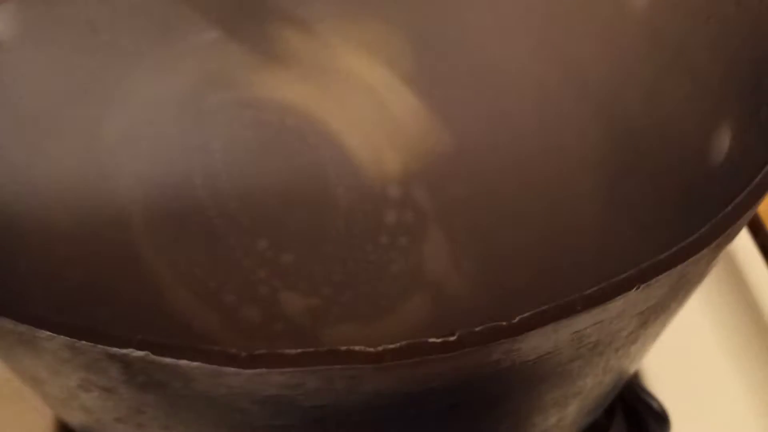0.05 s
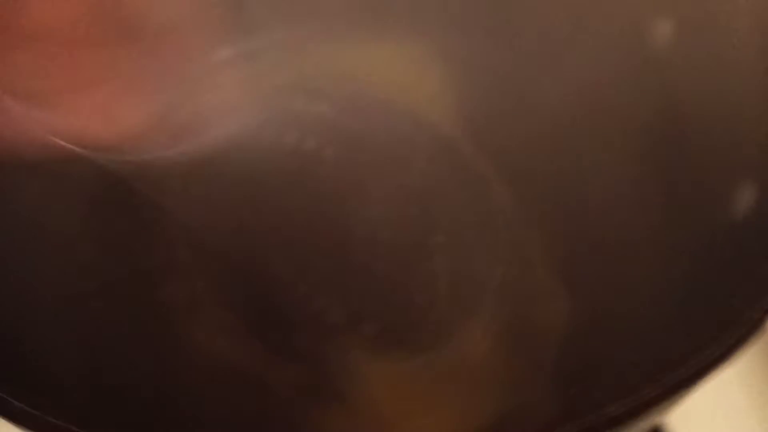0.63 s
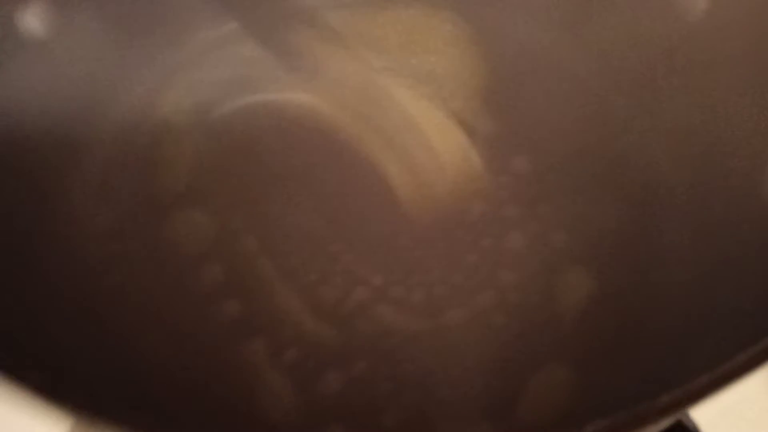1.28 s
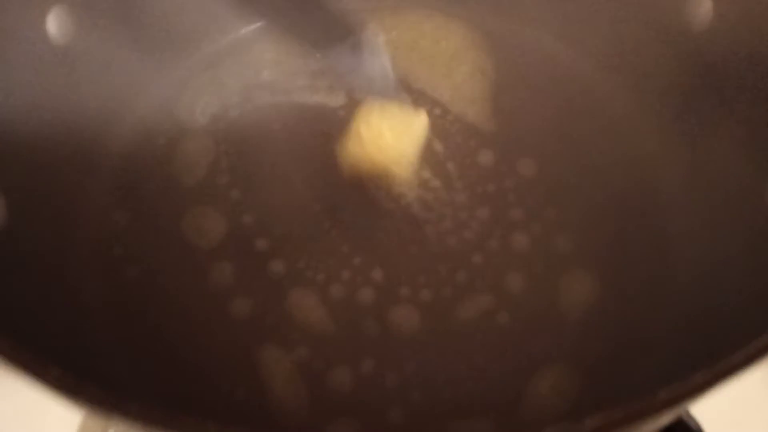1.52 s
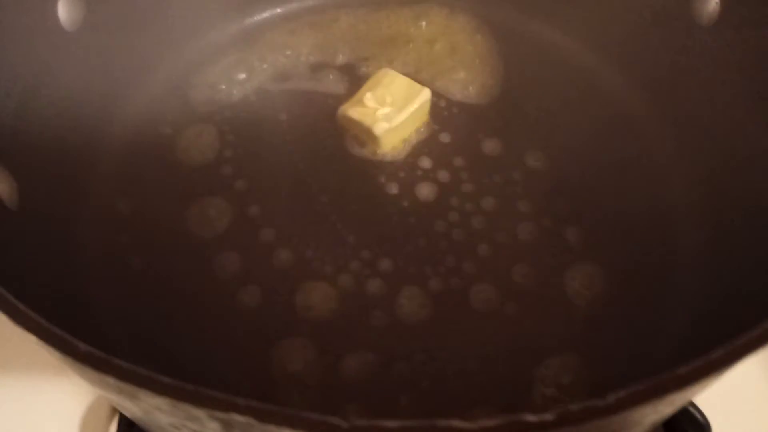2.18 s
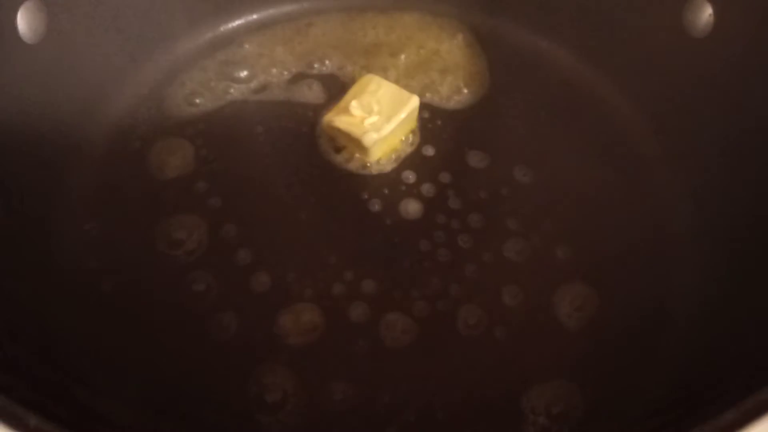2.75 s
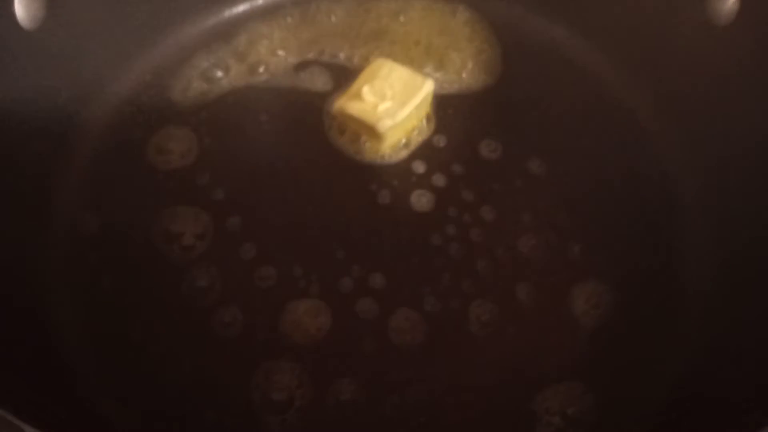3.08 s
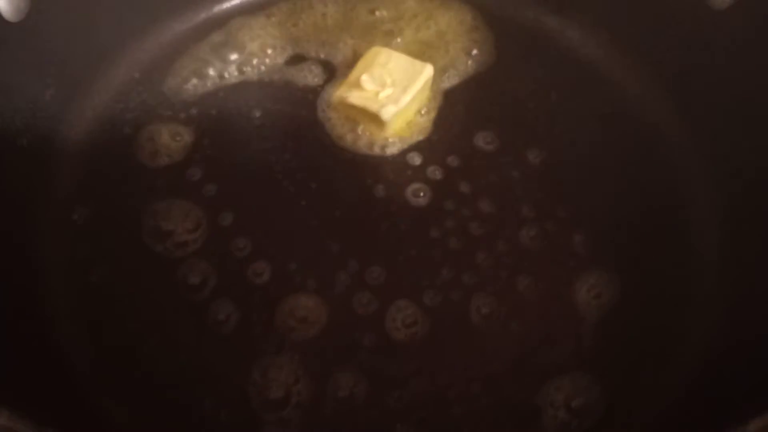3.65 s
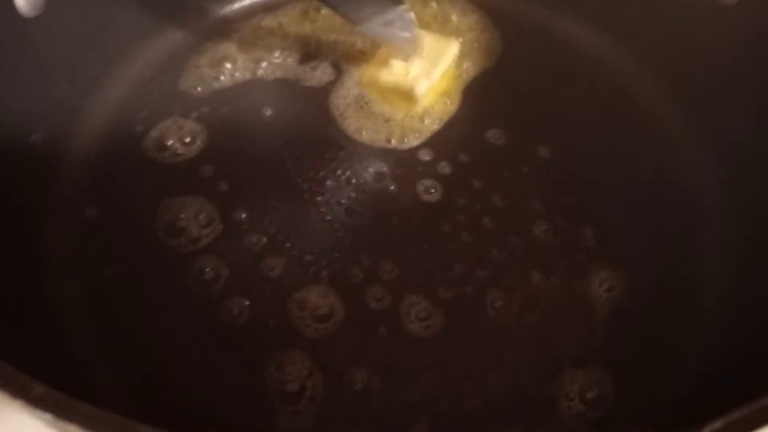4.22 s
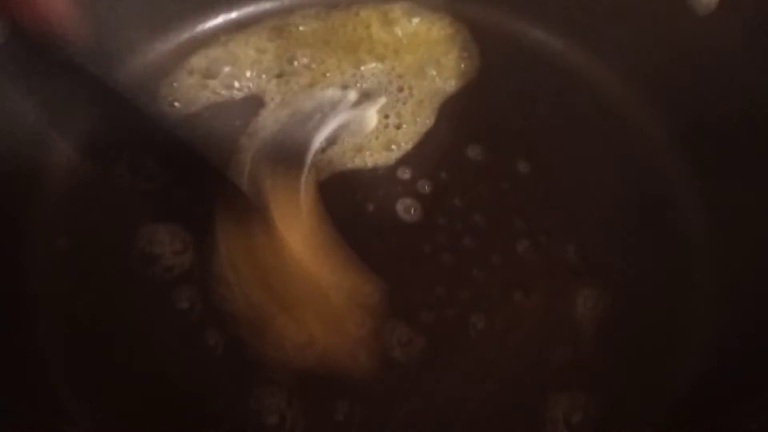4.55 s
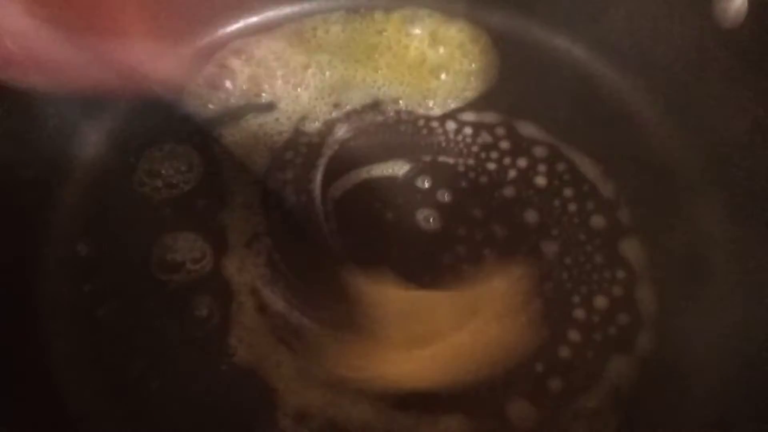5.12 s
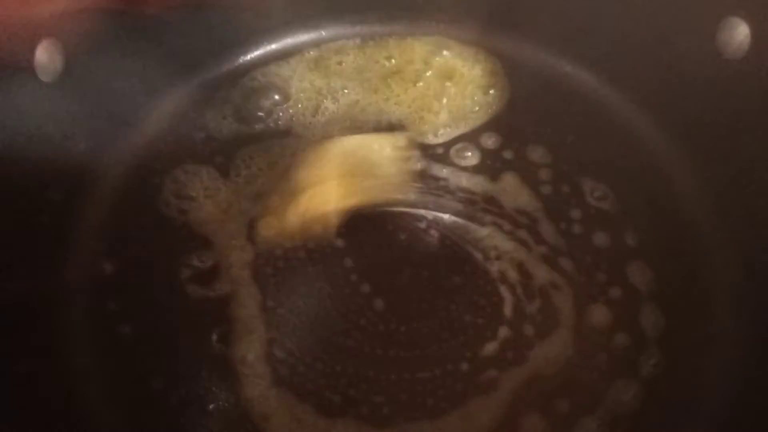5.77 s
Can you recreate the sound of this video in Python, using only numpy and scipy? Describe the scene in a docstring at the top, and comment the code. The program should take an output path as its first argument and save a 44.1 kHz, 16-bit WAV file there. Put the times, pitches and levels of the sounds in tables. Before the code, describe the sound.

A fine, crackling sizzle of melting butter, with a utensil clunking round the pan, pausing, then stirring again and scraping hard.

```python
"""Butter sizzles in a hot frying pan, heard in mono from close by the kitchen stove.
The lump is pushed round, left to melt, then pushed round again. Countless tiny steam bubbles
burst in the fat and a few larger ones spit. The utensil knocks and rubs the pan, which rings and
thuds on the stove; near the end one hard scrape makes the metal squawk. Behind it all lies a low,
wavering rush: room noise coloured by the resonance of the camera body."""
import sys
import numpy as np
from scipy import signal
from scipy.fft import rfft, irfft, next_fast_len
from scipy.io import wavfile

SR = 44100
rng = np.random.default_rng(int(sys.argv[2]) if len(sys.argv) > 2 else 0)


def transcribe(signal):
    """Save signal, clipped to [-1, 1], as a 16-bit WAV file at the path in sys.argv[1]."""
    frames = np.atleast_2d(signal).T
    limited = np.clip(frames, -1, 1)
    pcm = np.round(limited * 32767).astype(np.int16)
    wavfile.write(sys.argv[1], SR, pcm)


N = 260190
TIME = np.arange(N) / SR

# modes of the rubbed pan: f/Hz, nominal width/Hz, level under a light touch/dB, level pressed hard/dB
RUBBED_MODES = [(474, 26, -21, -16), (545, 30.5, 4, 3), (605, 33, -3, -1), (641, 15, -15, 1),
                (683, 57, -19, -19), (1089, 16.4, 6.5, 0.5), (1137, 85, -0.5, -6.5), (1724, 40, 0.5, -5),
                (1930, 200, -19.5, -15), (2540, 180, -7.5, -21)]


def sizzle(gain_db=3.5, clump_db=6.5, hiss_db=-6, patter_db=-16):
    """Bubbles burst in clumps over a fine hiss; butter spread thin boils brighter and more evenly."""
    # boiling of the fat: t/s, relative level/dB, treble lift as the butter thins/dB
    boil = [(0, -34, 4), (.45, -33, 3.5), (1, -34, 4), (1.2, -33.5, 4), (1.5, -31.5, 3), (2.1, -32, 2.5),
            (2.5, -32.6, 1.9), (3.2, -32.5, 1.97), (3.85, -31, 1.5), (4.4, -32, 1.8), (4.55, -34, 4.6),
            (4.76, -36, 7.5), (5.35, -34.8, 6), (5.65, -33.3, 4), (5.9, -33.5, 4)]
    # spectrum of the bursting bubbles: f/Hz, level/dB
    fizz = [(800, -34.5), (1500, -22), (2500, -17), (3200, -15), (3900, -9.5), (5200, -1.5), (6500, 8),
            (7150, 5.5), (8000, -7), (9200, -5), (10800, 3.5), (12300, -4), (13900, -9.5), (14700, 3.5),
            (15700, 2.5)]
    # modes of the pan under the fat: f/Hz, nominal width/Hz, level/dB
    patter_modes = [(585, 58, 0), (1117, 110, -2), (1673, 42, -2.5), (2271, 32, 4.5), (2856, 64, 5),
                    (3685, 230, 7), (3950, 103, 13), (4580, 390, 10)]
    times, levels, lifts = np.transpose(boil)
    boil_db, thin_db = np.interp(TIME, times, levels), np.interp(TIME, times, lifts)
    unrest = np.clip(0.5 - 0.074 * thin_db, .2, 2)
    clumps = amp(clump_db * unrest * drift(rate_hz=26))
    bursts = clumps * bubbles(per_s=3000, spread_db=5.5)
    hiss = amp(hiss_db) / unrest * rng.standard_normal(N)
    in_air = unit_rms(colour(bursts + hiss, fizz))
    highpass = signal.firwin2(63, [0, 7000, 13500, SR / 2], [0, 0, 1, 1], fs=SR)
    treble_lift = signal.oaconvolve(in_air, highpass, "same") * (amp(thin_db) - 1)
    # the bigger bubbles of a thick pool also shake the metal
    in_metal = amp(patter_db - thin_db) * resonances(clumps * rng.standard_normal(N), patter_modes)
    return amp(boil_db + swells_db() + gain_db) * (in_air + treble_lift + in_metal)


def bubbles(per_s, spread_db, spurt_db=3, classes=16):
    """Steam bubbles burst with brief snaps; each size class has its own pitch and its own spurts."""
    t, out = np.arange(100) / SR, np.zeros(N)
    for hz in np.linspace(2500, 17000, classes):
        at = np.flatnonzero(rng.random(N) < per_s / classes / SR)
        strength_db = spread_db * (hz / 9000) ** 0.5 * np.minimum(rng.exponential(1, len(at)), 3)
        clicks = np.zeros(N)
        clicks[at] = amp(strength_db + spurt_db * drift(rate_hz=25)[at]) * rng.choice([-1, 1], len(at))
        snap = np.exp(-t / 0.00031) * np.cos(2 * np.pi * hz * t)
        out += unit_rms(pan_walls(np.convolve(clicks, snap)[:N]))
    return unit_rms(out)


def pan_walls(snaps, echo_db=-3, t60=0.086):
    """Each snap bounces about between the walls of the pan."""
    t = np.arange(1024) / SR
    echoes = rng.standard_normal(len(t)) * amp(-60 * t / t60) * (t > .0005)
    return snaps + amp(echo_db) * signal.oaconvolve(snaps, echoes / np.linalg.norm(echoes))[:N]


def swells_db():
    """The sizzle flares up or dips briefly, each time in one smooth arch."""
    # flares and dips: middle t/s, length/s, level change/dB
    arches = [(0.163, 0.16, 2), (0.244, .11, -3), (1.167, .08, -1.5), (2.357, 0.073, -1.5),
              (3.358, 0.14, 1.5), (3.477, .06, -3), (4.062, 0.11, -5), (4.27, 0.08, 1), (4.304, 0.034, -4),
              (4.663, 0.21, 1.5), (5.496, 0.059, 2.5)]
    return sum(db * np.cos(np.pi * np.clip((TIME - s) / length, -.5, .5)) ** 2
               for s, length, db in arches)


def spits(decay_s=0.0014):
    """A large bubble bursts with a short puff around its own pitch."""
    # single bursts of fat: t/s, level/dB, f/Hz
    bursts = [(2.875, -22, 11100), (3.493, -24, 10500), (3.507, -22, 7600), (3.909, -23, 6560),
              (4.172, -21, 10200), (4.244, -21.5, 6660), (4.354, -22, 10100), (4.39, -25.5, 5030),
              (4.429, -27.5, 7000)]
    t, out = np.arange(800) / SR, np.zeros(N)
    for s, db, hz in bursts:
        puff = resonances(rng.standard_normal(len(t)), [(hz, hz / 4, 0)])
        add(out, s, amp(db) * puff * np.exp(-t / decay_s))
    return out


def knocks(free_db=10, gripped_db=2.5, free_t60=1.6, gripped_t60=0.13, thud_t60=0.34, tail_t60=0.95):
    """Each blow rings the pan and jolts it against the stove; a firm grip chokes the ring."""
    # blows: t/s, relative level/dB, contact/ms, grip (0 the utensil bounces off, 1 it stays pressed on)
    blows = [(.102, -35.5, 0.17, 0.93), (.116, -38, .28, 0.89), (.175, -51, .25, 0.56),
             (.3037, -35, .13, 0.15), (.5195, -37, 0.44, 1), (.562, -43.5, 0.62, 0.69),
             (.7785, -35.5, .14, .15), (0.9726, -31.5, .16, 0.97), (.986, -36, 0.1, 0.82),
             (1.1284, -36, 0.13, 0.054), (1.160, -44, .42, 0.11), (1.409, -50, 0.97, 1),
             (4.1263, -34, 0.21, 0.25), (4.5026, -38.5, 0.51, .65), (4.578, -54, 0.8, 0.82),
             (4.8322, -37, 0.27, 0.44), (4.88, -46, 0.45, 0.6), (5.0171, -37, 0.38, 0.77),
             (5.114, -50, 0.45, 0.58), (5.2594, -37, 0.17, .55), (5.4175, -39.5, 0.45, 0.6)]
    # modes of the struck pan: f/Hz, level/dB, t60 before the utensil's damping/s
    struck_modes = [(379, -25, 0.84), (518, -1, 0.03), (547.6, 0, 0.29), (539, -16.5, 1), (646.5, -8, 0.26),
                    (824, -7, 0.03), (1092, -4, 0.095), (975, -5, 0.013), (1050, -2, 0.017),
                    (1226, -5, 0.056), (1755, -7.5, 0.024), (2108, -5, 0.05), (2294, -13, 0.15),
                    (2660, -3, 0.025), (3344, -12, 0.09), (3800, -6.5, 0.041), (5300, 2.5, 0.03)]
    # spectrum of the pan hitting the stove: f/Hz, level/dB
    thud_spectrum = [(30, -24), (70, -10), (130, -5), (250, -2), (450, 1), (650, -6), (850, -6.5),
                     (1150, -10.5), (1500, -11), (2800, -16), (5000, -15.5), (9000, -92)]
    # spectrum of stove and room after a blow: f/Hz, level/dB
    tail_spectrum = [(30, -27), (110, 9.5), (220, 2.5), (420, -17), (750, -35), (1200, -14), (3000, -48),
                     (6000, -54)]
    t, out = np.arange(SR) / SR, np.zeros(N)
    hz, mode_db, t60 = np.transpose(struck_modes)[:, :, None]
    signs = (-1) ** np.arange(len(hz))[:, None]  # neighbouring modes start in opposite directions
    thud_attack = 1 - np.exp(-t / 0.0008)
    for s, db, contact_ms, grip in blows:
        # each spot on the pan rings a little differently
        spot_db, detune = rng.uniform(-1.06, 1, (2, len(hz), 1))
        push = 1 / (1 + (hz * contact_ms / 1000) ** 2)  # a longer contact is duller
        tones = signs * np.sin(2 * np.pi * hz * (1 + 0.0097 * detune) * t)
        ring = (push * amp(mode_db + spot_db - 60 * t / t60) * tones).sum(0)
        ring_db = free_db + grip * (gripped_db - free_db)
        damping_t60 = free_t60 * (gripped_t60 / free_t60) ** grip
        add(out, s, amp(db + ring_db - 60 * t / damping_t60) * ring)
        thud = unit_rms(colour(gritty_noise(SR, grit=0.45), thud_spectrum)) * amp(-60 * t / thud_t60)
        tail = unit_rms(colour(rng.standard_normal(SR), tail_spectrum)) * amp(-18 - 60 * t / tail_t60)
        add(out, s, amp(db - 1) * (thud + tail) * thud_attack)
    return out


def scrape(level_db=-32.5, waver=0.013, upper_db=-13):
    """The utensil catches, chatters, and locks now and then onto two pan modes."""
    # moments of squeal: t/s, length/s, level/dB
    squeals = [(5.504, 0.014, -28), (5.521, .02, -24.5), (5.555, 0.035, -30), (5.647, 0.0073, -28),
               (5.703, 0.022, -43.5)]
    # the two squealing modes: f/Hz
    squeal_hz = [1078, 1724]
    pressure = amp(level_db) * envelope(start_s=5.501, length_s=0.18, rise_s=0.0039, t60=0.28)
    modes = [(hz, width, hard) for hz, width, light, hard in RUBBED_MODES]
    chatter = friction(modes, slips_per_s=2700, uneven_db=1.5)
    pitches = [hz * (1 + waver * drift(rate_hz=90)) for hz in squeal_hz]
    lower, upper = (unit_rms(np.sin(2 * np.pi * np.cumsum(hz) / SR)) for hz in pitches)
    squeal = gestures(squeals, rise_s=0.0053, t60=.07) * (lower + amp(upper_db) * upper)
    return pressure * chatter + squeal


def stirring():
    """The utensil slides quietly on the greased metal and rasps where its edge digs in."""
    # sliding strokes: t/s, length/s, level/dB
    strokes = [(-.05, 0.17, -47), (.37, 0.15, -47.5), (.58, 0.09, -57.5), (.83, 0.34, -51),
               (1.18, .14, -55.5), (4.42, 0.3, -51), (4.88, 0.54, -56), (5.4, 0.47, -61)]
    # digs of the edge: t/s, length/s, relative level/dB
    digs = [(.09, 0.062, -41.5), (.39, 0.027, -52), (5.565, 0.046, -43.5)]
    # spectrum of the rasp: f/Hz, level/dB
    rasp_spectrum = [(900, -24), (1600, -36), (1880, -4), (2300, -4.5), (2850, 2), (3400, -3), (6000, -49)]
    modes = [(hz, width, light) for hz, width, light, hard in RUBBED_MODES]
    rub = friction(modes, slips_per_s=2500, uneven_db=4.5)
    rasp = amp(-1) * unit_rms(colour(gritty_noise(N, grit=0.36), rasp_spectrum))
    return gestures(strokes, rise_s=0.053, t60=0.51) * rub + gestures(digs, rise_s=0.015, t60=0.27) * rasp


def friction(modes, slips_per_s, uneven_db):
    """Tiny slips of the utensil drive the resonances of the pan."""
    slips = rng.standard_normal(N) * (rng.random(N) < slips_per_s / SR)
    return resonances(slips * amp(uneven_db * drift(rate_hz=11)), modes)


def scuffs(reference_hz=215):
    """Soft brushing close to the microphone; a lighter scuff has the same colour, pitched higher."""
    # scuffs: t/s, length/s, level/dB, f/Hz
    brushes = [(3.276, 0.079, -41.5, 215), (3.574, .04, -52, 585), (4.371, 0.047, -51, 570)]
    # spectrum of a scuff at the reference pitch: f/Hz, level/dB
    spectrum = [(35, -38), (60, -21), (113, -26), (215, -2.5), (503, -15.5), (577, -13), (1080, -29),
                (1180, -26), (1350, -32), (1550, -18), (3500, -18.5), (4550, -28), (7700, -120)]
    out = np.zeros(N)
    for s, length, db, hz in brushes:
        shifted = [(f * hz / reference_hz, level) for f, level in spectrum]
        brush = unit_rms(colour(rng.standard_normal(N), shifted))
        out += amp(db) * envelope(s, length, rise_s=0.02, t60=0.34) * brush
    return out


def metal_rings():
    """Lightly touched metal sings faintly for a second, barely damped."""
    # ringing tones: t/s, f/Hz, level/dB, t60/s
    tones = [(1.405, 880, -56.5, 1.2), (2.893, 735, -63.5, 7.3)]
    t, out = np.arange(SR) / SR, np.zeros(N)
    for s, hz, db, t60 in tones:
        add(out, s, amp(db - 60 * t / t60) * np.sin(2 * np.pi * hz * t))
    return out


def background_rush(level_db=-60, waver_db=2.46):
    """A low, wavering rush: room noise coloured by the resonance of the camera body."""
    # room noise with the camera body's bump at 200-350 Hz: f/Hz, level/dB
    spectrum = [(25, -17), (70, -18), (115, -8.5), (160, -14.5), (215, 0.5), (320, -0.5), (480, -8),
                (640, -46), (820, -25), (1500, -28), (5000, -39)]
    gain = amp(level_db + waver_db * drift(rate_hz=29))
    return gain * unit_rms(colour(rng.standard_normal(N), spectrum))


def amp(db):
    """Decibels to gain."""
    return 10 ** (np.asarray(db) / 20)


def unit_rms(x):
    """Scales to rms 1."""
    return x / np.sqrt(np.mean(x ** 2) + 1e-20)


def add(mix, s, sound):
    """Mixes a sound in at s seconds."""
    part = mix[max(round(s * SR), 0):][:len(sound)]
    part += sound[:len(part)]


def gritty_noise(size, grit):
    """Noise that grows spikier with grit."""
    return rng.standard_normal(size) * np.exp(grit * rng.standard_normal(size))


def colour(x, spectrum, size=4096):
    """Causal filter with a spectrum of (f/Hz, level/dB), so clicks keep their sharp start."""
    hz, db = np.transpose(spectrum)
    bin_hz = abs(np.fft.fftfreq(size, 1 / SR))
    log_gain = np.log(amp(np.interp(np.log(bin_hz + 1), np.log(hz + 1), db)))
    minimum_phase = np.exp(np.conj(signal.hilbert(log_gain)))
    taps = np.fft.ifft(minimum_phase).real[:size // 2]
    return signal.oaconvolve(x, taps)[:len(x)]


def drift(rate_hz):
    """Smooth random wandering of rms 1, mostly between 4 Hz and rate_hz."""
    size = next_fast_len(N)
    hz = np.fft.rfftfreq(size, 1 / SR)
    spectrum = rfft(rng.standard_normal(size)) * (hz > 4) / (1 + (hz / rate_hz) ** 2)
    return unit_rms(irfft(spectrum, size)[:N])


def resonances(drive, modes):
    """Rings steep modes of (f/Hz, nominal width/Hz, level/dB), each two broader peaks in series."""
    out = np.zeros(len(drive))
    for hz, width, db in modes:
        peak = signal.iirpeak(hz, hz / (2 * width), fs=SR)
        out += amp(db) * signal.lfilter(*peak, signal.lfilter(*peak, drive))
    return unit_rms(out)


def envelope(start_s, length_s, rise_s, t60):
    """Rises, holds until length_s after the start, then dies away."""
    t = TIME - start_s
    return np.clip(t / rise_s, 0, 1) * amp(-60 * np.maximum(t - length_s, 0) / t60)


def gestures(events, rise_s, t60):
    """The joint envelope of events given as (t/s, length/s, level/dB)."""
    return sum(amp(db) * envelope(s, length, rise_s, t60) for s, length, db in events)


def scene():
    """Everything at the stove, as one microphone hears it."""
    pan = sizzle() + spits() + knocks() + metal_rings() + stirring() + scrape()
    return (pan + background_rush() + scuffs())[None]


def record(dry):
    """The recorder cuts off the highest treble."""
    lowpass = signal.firwin(601, cutoff=15770, window=("kaiser", 9), fs=SR)
    return signal.oaconvolve(dry, lowpass[None], "same")


dry = scene()
out = record(dry)
transcribe(out)
```